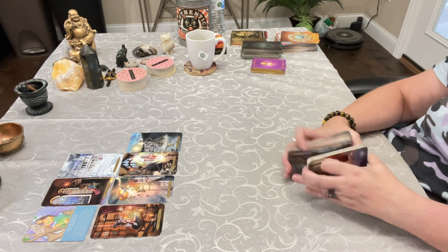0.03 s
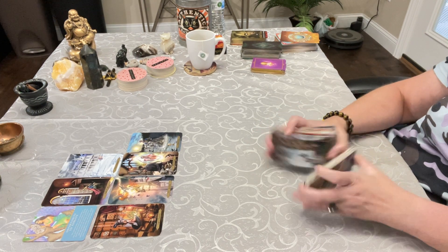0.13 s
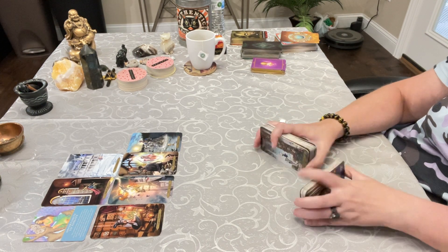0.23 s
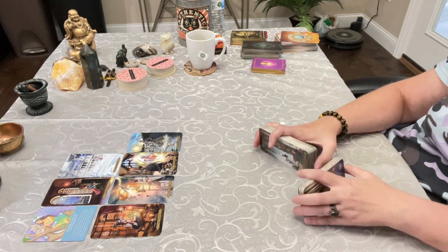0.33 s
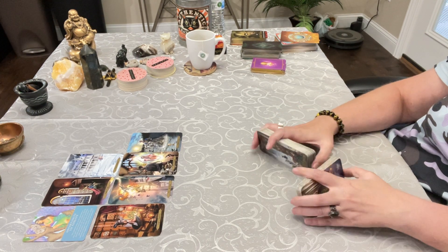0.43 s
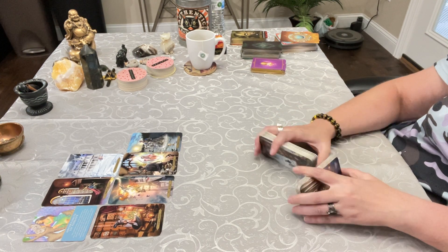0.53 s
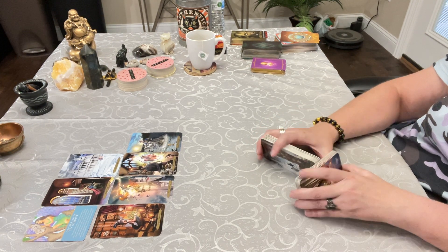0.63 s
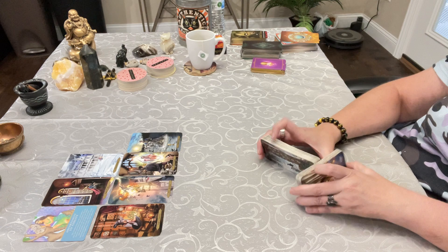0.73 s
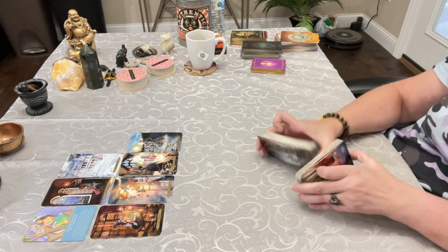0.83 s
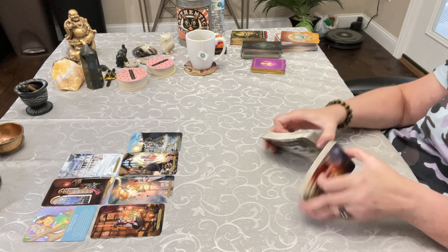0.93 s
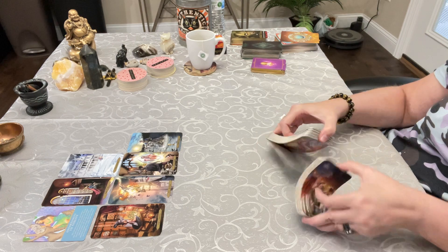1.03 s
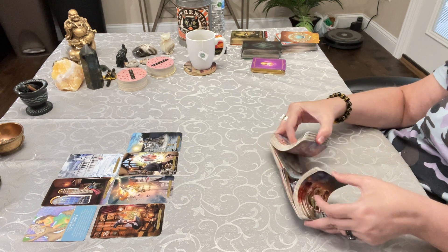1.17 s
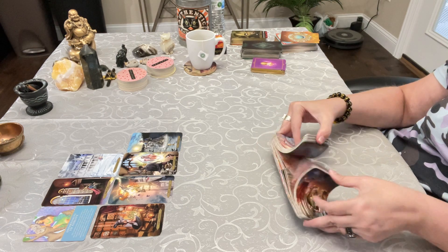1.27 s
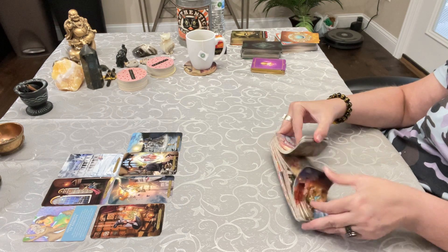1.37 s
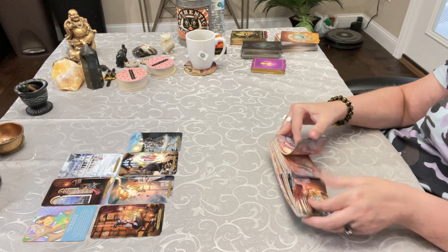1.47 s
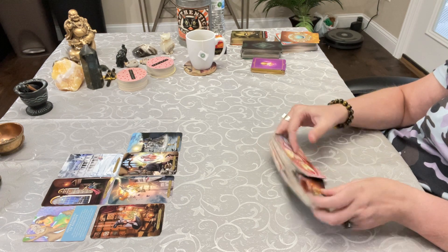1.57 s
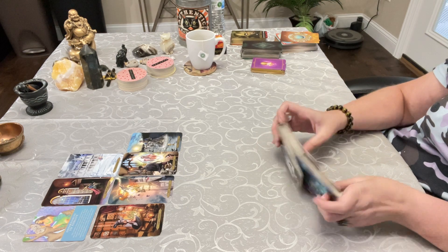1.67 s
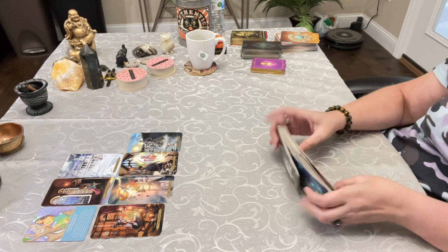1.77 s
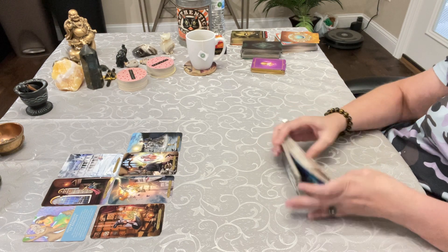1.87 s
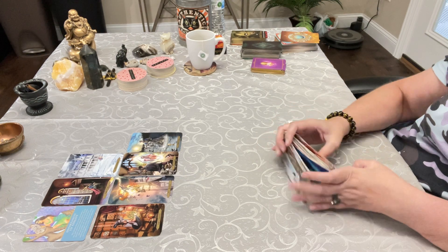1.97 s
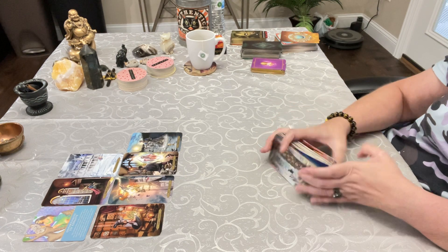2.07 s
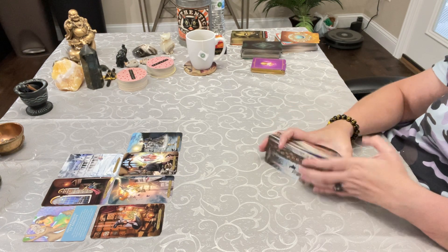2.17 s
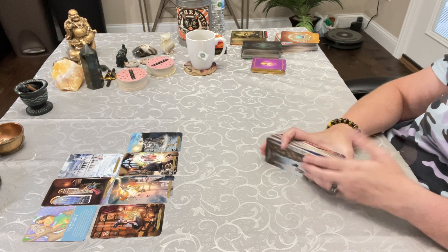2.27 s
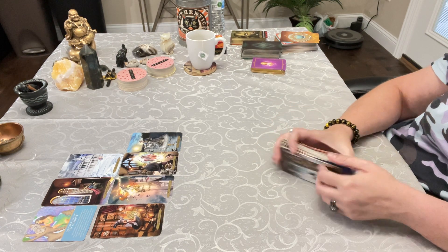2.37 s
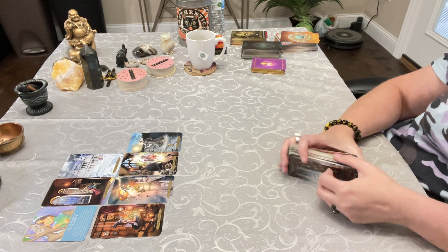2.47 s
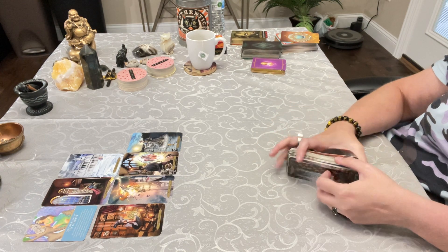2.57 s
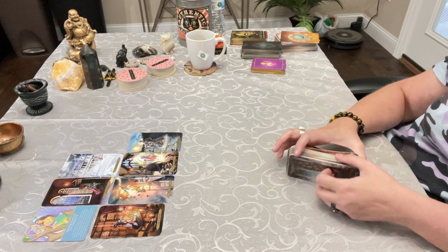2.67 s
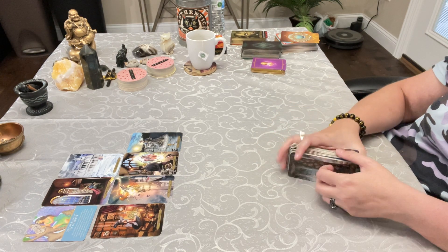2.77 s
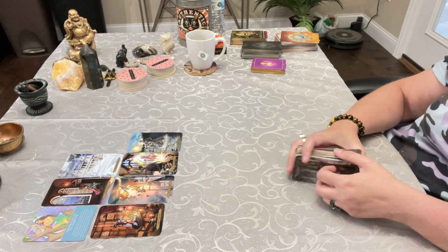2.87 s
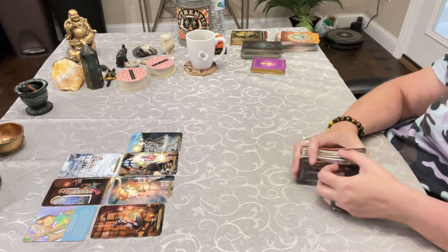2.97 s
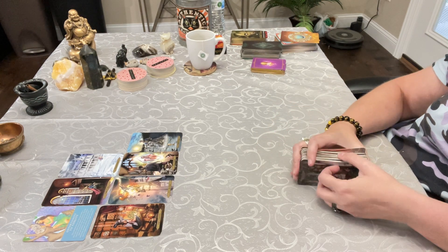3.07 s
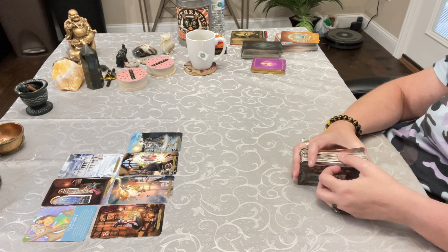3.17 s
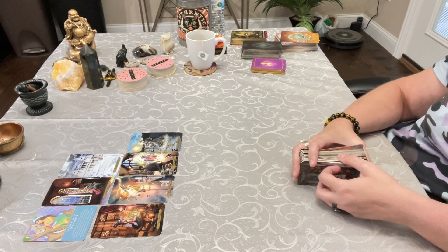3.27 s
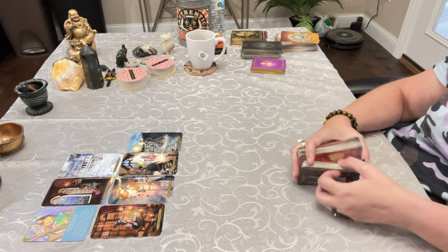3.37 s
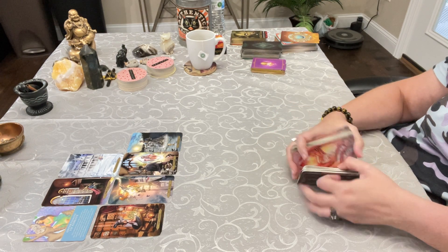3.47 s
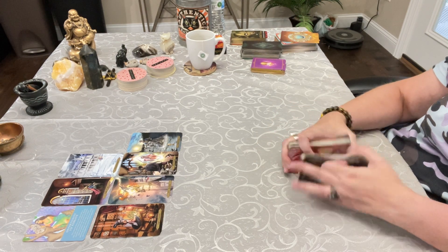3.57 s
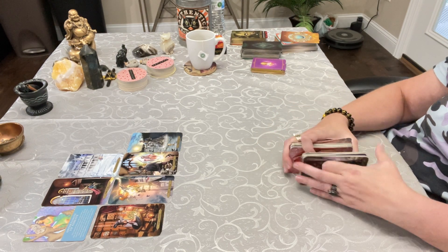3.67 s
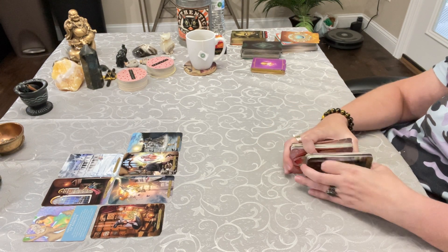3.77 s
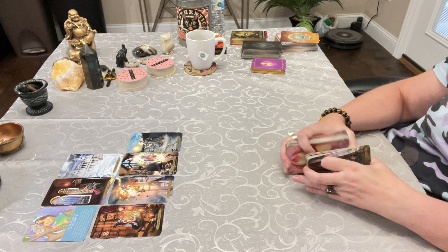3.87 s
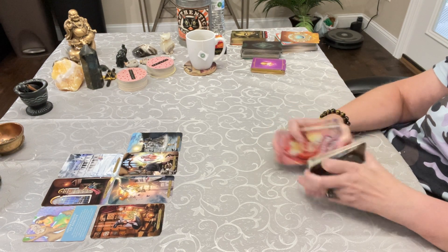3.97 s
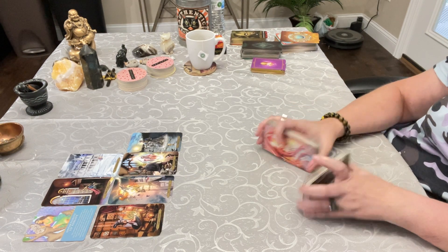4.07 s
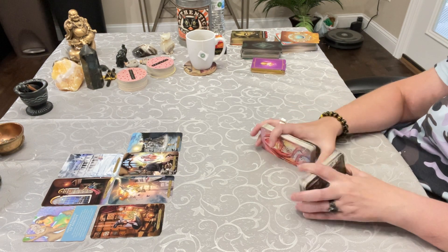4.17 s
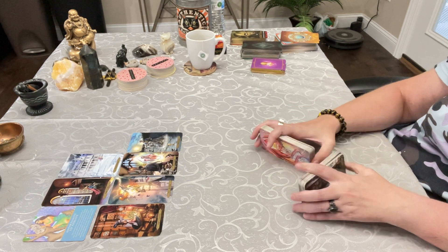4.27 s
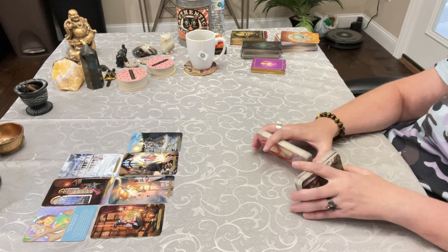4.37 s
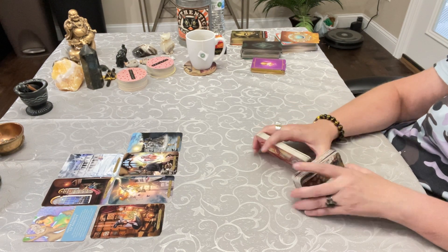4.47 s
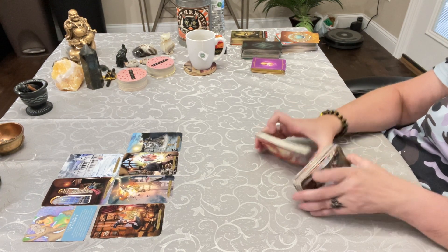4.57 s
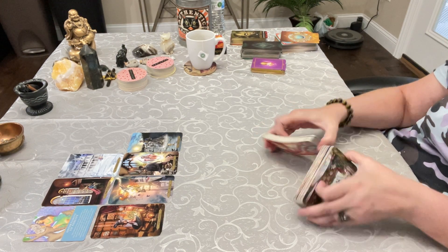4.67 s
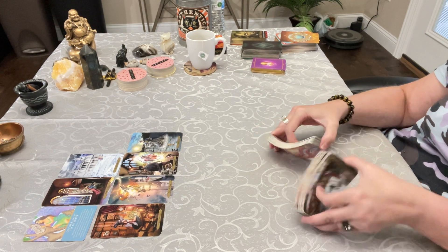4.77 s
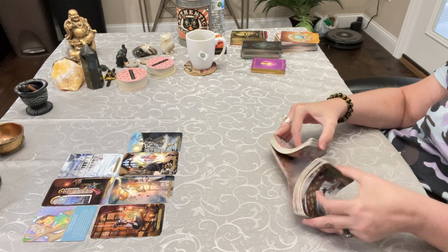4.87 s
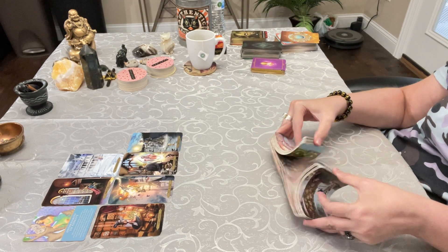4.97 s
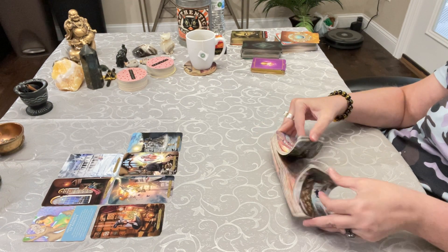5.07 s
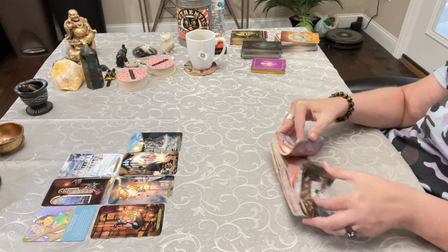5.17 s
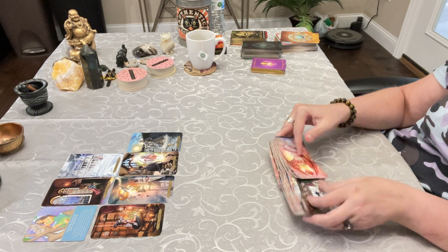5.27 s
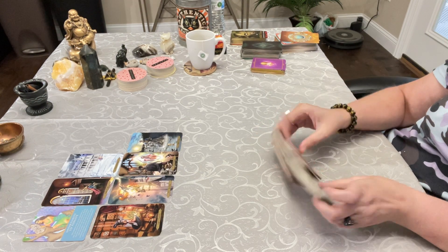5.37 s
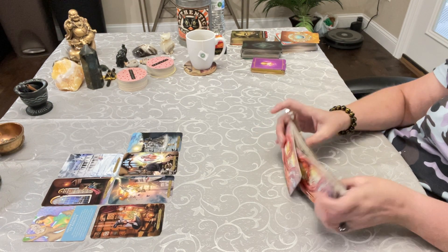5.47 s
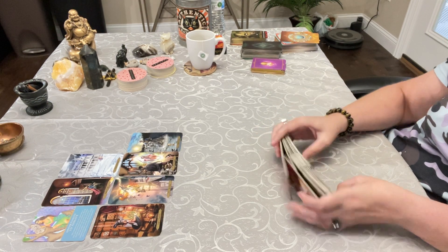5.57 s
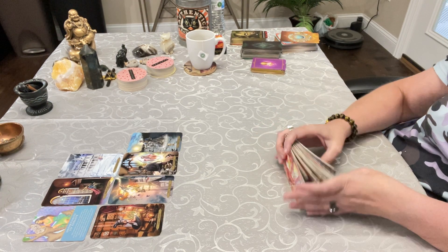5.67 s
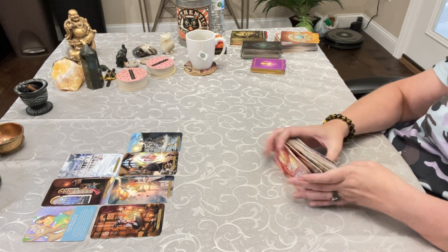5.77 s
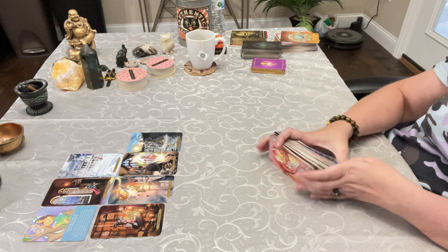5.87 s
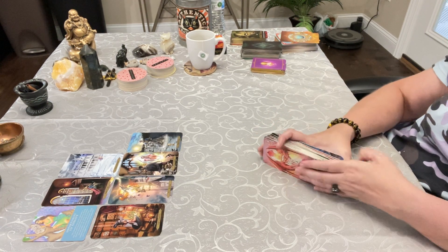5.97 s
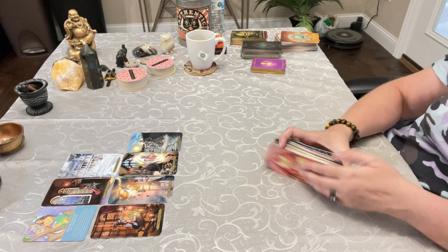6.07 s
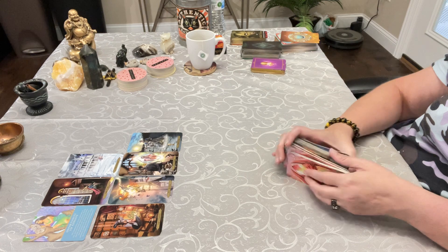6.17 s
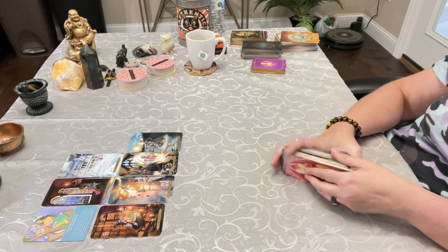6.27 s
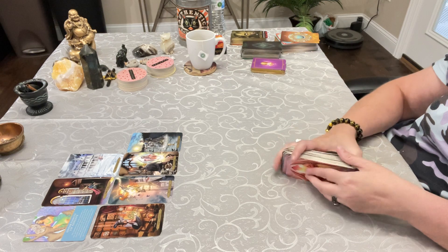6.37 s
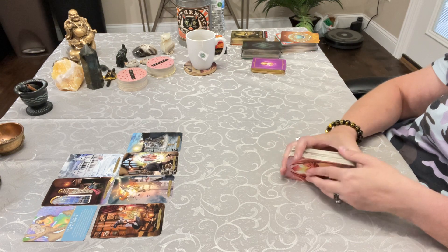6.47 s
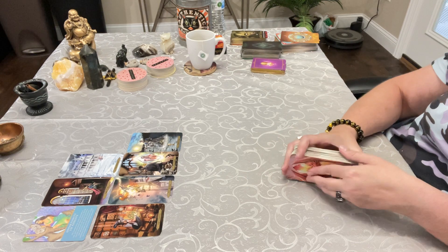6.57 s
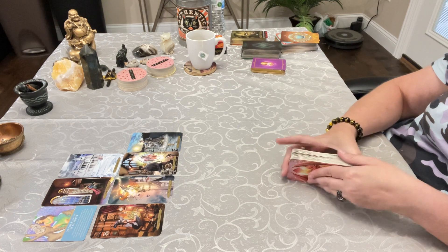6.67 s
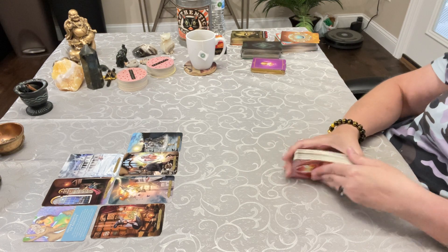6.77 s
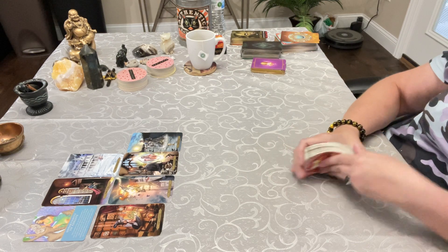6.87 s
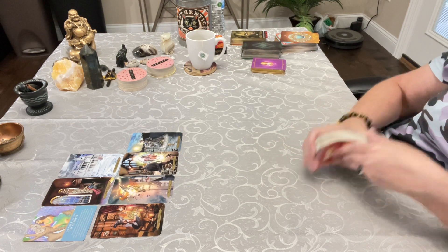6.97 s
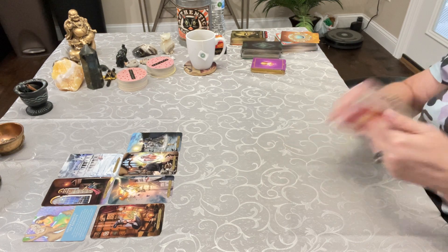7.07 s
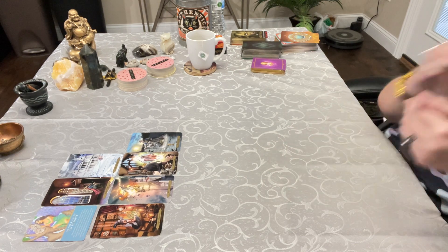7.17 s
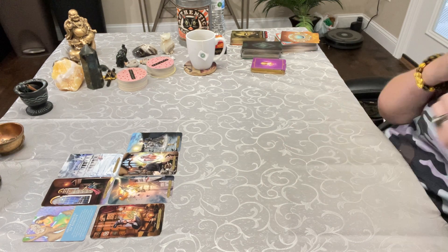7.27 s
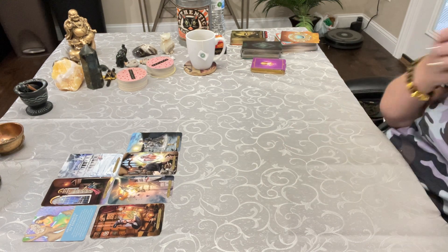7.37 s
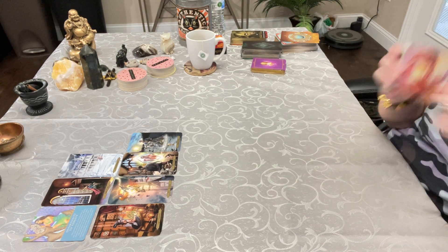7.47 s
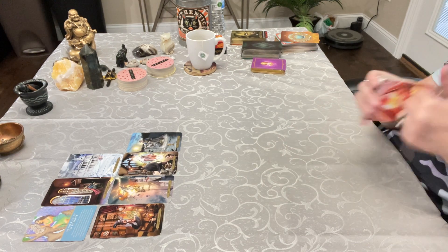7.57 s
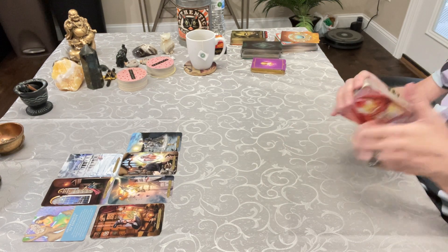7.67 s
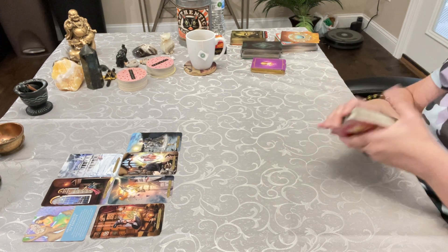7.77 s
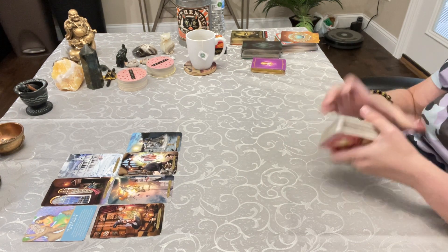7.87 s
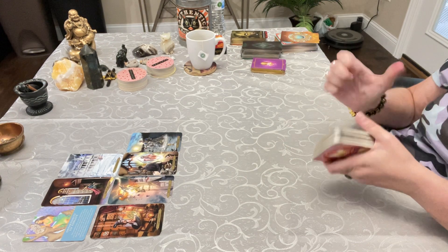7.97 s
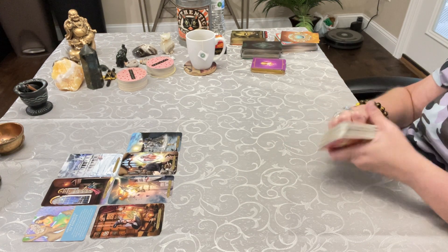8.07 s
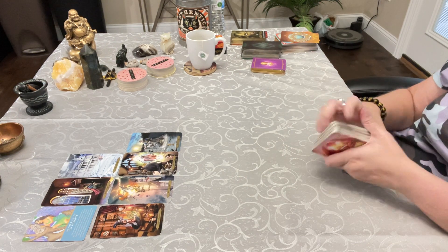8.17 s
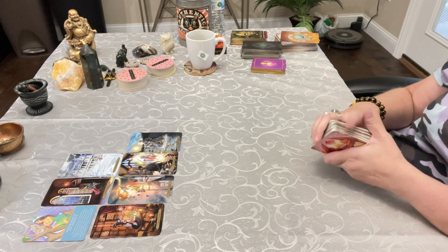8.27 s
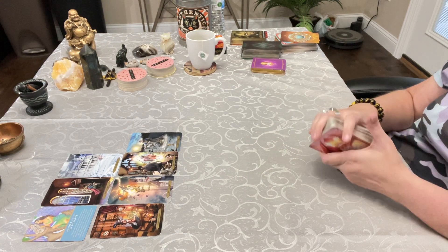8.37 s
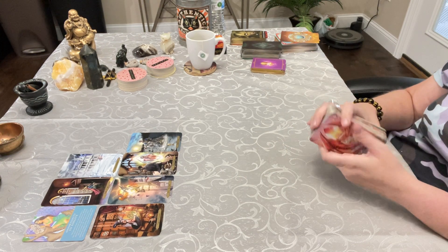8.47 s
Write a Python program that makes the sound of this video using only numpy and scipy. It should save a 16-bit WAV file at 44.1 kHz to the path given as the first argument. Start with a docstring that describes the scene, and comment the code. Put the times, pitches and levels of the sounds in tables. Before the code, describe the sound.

A deck of cards is riffled twice in crisp bursts, knocked and squared on a table, then slapped into a hand in a quiet room.

```python
"""Two riffle shuffles on a cloth-covered table

A quiet room, a two-port microphone close to the hands. Large cards snap off the thumbs and patter
onto the pile; around the riffles the deck is knocked, squared and slid about, then lifted and
slapped into a cupped palm. The table top booms under each knock and the room rings briefly."""
import sys
import numpy as np
from scipy import signal
from scipy.fft import rfft, irfft, next_fast_len
from scipy.io import wavfile

SR = 44100
rng = np.random.default_rng(int(sys.argv[2]) if len(sys.argv) > 2 else 0)


def transcribe(u):
    """Save the signal u as a 16-bit wav file named by the first command-line argument.

    u: samples, shape (n,) or (channels, n), limited to [-1, 1]; the rate is SR.
    q: integer samples, one column per channel.
    """
    v = np.clip(np.atleast_2d(u).T, -1, 1)
    q = np.round(v * 32767).astype(np.int16)
    wavfile.write(sys.argv[1], SR, q)


N = 375291


def flick(db, hz, ms, tick_db, puff_db):
    """A bent card scrapes free and rings for an instant; its edge ticks and it pushes a puff of air."""
    ring = [(hz / 3.3, -30), (hz / 2.6, -13), (hz / 1.5, -7), (hz, 0),
            (hz * 1.3, -7), (hz * 2.3, -12), (hz * 5.4, -26), (hz * 6, -50)]
    card = burst(ring, 0.4 * ms, 0.57 * ms)
    tick = burst([(4500, -45), (6500, 2.5), (11000, -3), (16500, -13.5)], 0.087 * ms, 0.69 * ms)
    puff = burst([(120, -27), (350, -1.5), (800, -0.5), (1300, -5), (2500, -45)], 0.17 * ms, 0.35 * ms)
    return gain_of(db) * (card + gain_of(tick_db) * tick + gain_of(puff_db) * puff)


# single card edges coming free: t/s, level/dB, card f/Hz, relative tick level/dB
SNAPS = [(0.092, -55.5, 2480, -3), (0.843, -45, 919, -2), (.893, -50.5, 1292, 0.5),
         (1.1074, -30, 1460, -16.5), (1.13, -21, 2760, -1.5), (1.1473, -19.5, 2507, -9.5),
         (1.1545, -11.5, 2715, -3.5), (1.1696, -28.5, 3794, -3.5), (1.248, -23, 1760, -9),
         (1.2566, -15.5, 3096, -3), (1.2691, -23, 3280, -3.5), (1.288, -10, 3090, -15.5),
         (1.2993, -14, 3446, -11.5), (1.3095, -18.5, 2907, -11.5), (1.3311, -21.5, 3947, -13.5),
         (1.3445, -12, 2646, -23), (1.3599, -17.5, 3843, 3), (1.371, -25.5, 2806, 1.5),
         (1.421, -26, 1838, -4), (1.4366, -15.5, 2497, -36.5), (1.4756, -26, 2526, 0),
         (1.4786, -19.5, 3215, -9), (1.5012, -30, 2580, -11), (1.5185, -22, 4480, -14),
         (1.5333, -24, 4116, -10.5), (2.452, -51, 1020, -18), (2.548, -46, 1130, -20),
         (2.613, -44, 2020, -5.5), (2.846, -58.5, 3876, 5), (3.411, -45, 1920, -10),
         (3.593, -54.5, 4500, 11), (3.619, -57, 3500, -0.5), (3.987, -58, 3200, -23),
         (4.502, -49, 1253, -9.5), (4.605, -53.5, 2960, -13), (4.644, -58.5, 876, -20),
         (4.748, -61.5, 1360, 0.5), (4.8569, -30.5, 2495, -27), (4.8774, -30, 1600, -31),
         (4.891, -26, 2270, -1.5), (4.9198, -25, 2010, 0), (4.951, -23, 2646, -3),
         (4.974, -24.5, 1810, -4.5), (4.9839, -22.5, 3130, 3.5), (4.99, -17.5, 3780, -12),
         (5.0039, -33.5, 1862, -2), (5.0186, -23, 2194, -4), (5.0316, -28.5, 3167, 4.5),
         (5.0472, -24, 2745, -4.5), (5.0527, -15.5, 2737, -1), (5.0621, -21, 2450, -6),
         (5.0809, -12, 3537, -14), (5.0855, -20, 3450, 0), (5.1126, -19, 2645, -8),
         (5.1301, -26.5, 3320, -0.5), (5.14, -21.5, 2153, -2), (5.1543, -17.5, 2650, -13),
         (5.1638, -24.5, 1980, -24), (5.1718, -31, 3394, 15), (5.1921, -19, 2770, -8),
         (5.209, -19.5, 2530, -20), (5.233, -22, 2890, -32.5), (5.257, -28, 3400, -25),
         (5.2671, -26, 3500, -3.5), (5.2833, -30.5, 2770, -24.5), (5.423, -39, 2740, -27),
         (5.46, -35.5, 3470, -5.5), (6.848, -27, 1600, -13), (6.958, -43.5, 3060, -28),
         (7.758, -44, 3240, -16), (7.855, -55, 4660, -14), (8.151, -38.5, 2396, -21),
         (8.233, -50.5, 3320, -9)]
RIFFLED_MS, CAUGHT_MS = 3.2, 2.2  # a bent card scrapes longer than a loose edge

def snaps():
    """Cards snap off a thumb onto the pile, drumming on the table, or catch between raised hands."""
    cards, aloft, force = np.zeros((3, N))
    spans = [(rows[0][0], rows[-1][0]) for rows in RIFFLES]
    for s, db, hz, tick_db in SNAPS:
        stretch = np.exp(0.17 * rng.standard_normal())
        progress = [(s - start) / (end - start) for start, end in spans if start <= s <= end]
        if progress:
            excess_db = db + 22
            ms = RIFFLED_MS * stretch * gain_of(0.24 * excess_db)  # harder snaps last longer
            puff_db = -21.5 + 0.42 * excess_db - 8 * progress[0]  # puffs fade as the pile builds
            add(cards, s, flick(db, hz, ms, tick_db, puff_db - db))
            add(force, s, push(db - 11, ms=3.9))
        else:
            add(aloft, s, flick(db, hz, CAUGHT_MS * stretch, tick_db, puff_db=-7.5))
    return cards, aloft, force


# outline of the patter, one list a riffle: t/s, level/dB
RIFFLES = [
    [(1.1, -58), (1.2, -45.5), (1.3, -38.5), (1.386, -37), (1.56, -50)],
    [(4.85, -44.5), (4.95, -39), (5.048, -31), (5.128, -30.5), (5.22, -41), (5.3, -37.5)],
]
# spectrum of falling cards: f/Hz, level/dB
FALL_COLOUR = [(150, -14), (400, -1.5), (1600, 0.5), (2900, -6.5), (6000, -5.5), (10000, -17.5),
               (15000, -22), (16500, -25)]

def patter():
    """Cards patter onto the pile between the loud snaps."""
    t = np.arange(N) / SR
    outline = sum(gain_of(np.interp(t, *np.transpose(rows), -200, -200)) for rows in RIFFLES)
    return coloured(grit(per_s=400, spread_db=3.5, decay_ms=1.2), FALL_COLOUR) * outline


def blow(db, hz, ms, crack_db):
    """A dull blow centred on hz, with a crack where card edges meet."""
    colour = [(80, -20), (hz / 6.4, -5), (hz, 0), (hz * 3.24, -12), (hz * 9.6, -45), (16000, -75)]
    thud = burst(colour, 1, ms, size=8192)
    crack = burst([(1500, -28.5), (3500, -4), (5500, -8.5), (8000, -14.5), (16000, -24)], 0.054, 1.3)
    add(thud, 0, gain_of(crack_db) * crack)
    return gain_of(db) * thud


# the deck striking the table, the last one knocked in the hands: t/s, level/dB, decay/ms, relative boom
# level/dB
KNOCKS = [(.208, -40.5, 47, 0), (.226, -20.5, 6.9, 8), (0.238, -27, 8.3, -6.5), (.6, -58, 8, 29),
          (0.808, -60, 10, 17), (1.035, -65, 12, 25), (1.829, -47.5, 19, 16), (2.066, -42.5, 9.4, 10),
          (2.401, -59, 6.6, 24), (2.497, -56, 6.9, 19), (3.549, -56, 9.4, 15.5), (3.621, -56, 7, 13.5),
          (4.085, -20, 9, -6.5), (4.103, -21, 13.2, 7.5), (4.709, -53, 11, 10), (5.502, -35.5, 24, 4),
          (5.517, -35.5, 5.7, 7), (5.79, -46, 48, 11), (5.82, -41, 7.3, 9.5), (6.164, -52, 8, 14.5),
          (6.254, -39, 11, 8), (6.277, -42, 10, 6.5), (6.662, -57, 11, 24.5), (7.762, -48, 5.1, -13.5)]

def knocks():
    """The deck hits the table, and once is knocked in the hands: harder knocks are brighter, softer ones push
    for longer."""
    cards, force = np.zeros((2, N))
    for s, db, ms, boom_db in KNOCKS:
        excess_db = db + 45
        hardness_hz = 480 * gain_of(0.22 * excess_db)
        crack_db = -77 + 0.4 * excess_db
        add(cards, s, blow(db, hardness_hz, ms, crack_db - db))
        add(force, s, push(db + boom_db, ms=1200 / hardness_hz))
    return cards, force


# the deck landing in the palm: t/s, level/dB, hardness f/Hz, decay/ms, relative crack level/dB
SLAPS = [(7.512, -18.5, 1550, 4.5, -15), (8.046, -53, 1203, 25, -32), (8.056, -24, 860, 2.16, -3.5),
         (8.06, -33.5, 900, 5.1, -4)]
CUP_HZ, CUP_T60_S, CUP_DB = 736, 0.036, -17

def slaps():
    """The lifted deck slaps the cupped palm and leaves the air hollow between them humming."""
    aloft, t = np.zeros(N), np.arange(8192) / SR
    cup = gain_of(-60 * t / CUP_T60_S) * np.sin(2 * np.pi * CUP_HZ * t)
    for s, *row in SLAPS:
        hit = blow(*row)
        hum = signal.fftconvolve(hit, cup / np.linalg.norm(cup))[:len(t)]
        add(aloft, s, hit + gain_of(CUP_DB) * hum)
    return aloft


def push(db, ms):
    """The smooth force of a blow; db sets its area."""
    bump = np.hanning(round(ms * SR / 1000) + 2)
    return gain_of(db) * bump / bump.sum()


# modes of the table top, and one of the deck near 1 kHz: f/Hz, level/dB, t60/s
TABLE_MODES = [(62, -7, .14), (90, -2, .12), (122, 5, .24), (165, -3, .1), (200, -4, .1), (255, -3, .12),
               (322, 0, .15), (608, -5, .12), (1060, -6, .05)]

def table_boom(force):
    """The table top rings in its low modes under each push, the deck briefly near 1 kHz."""
    t = np.arange(16384) / SR
    ring = sum(gain_of(db - 60 * t / t60) * np.sin(2 * np.pi * hz * t) for hz, db, t60 in TABLE_MODES)
    return signal.fftconvolve(force, ring / abs(ring).max())[:N]


# cards and sleeves sliding, one swell each: peak t/s, hiss level/dB, length/ms, drag level/dB
RUBS = [(0.104, -71, 11, -86), (0.58, -64.5, 107, -61), (0.681, -67, 24, -60), (0.882, -69, 122, -67.5),
        (1.698, -59.5, 290, -58), (1.899, -47, 69, -69), (2.109, -59.5, 88, -60), (2.21, -61.5, 44, -59),
        (2.413, -60.5, 183, -67), (2.604, -63.5, 70, -70.5), (2.859, -59, 38, -69), (3.27, -94, 51, -69.5),
        (3.395, -63, 70, -60.5), (3.6, -67.5, 130, -65.5), (3.815, -76, 78, -74.5), (4.495, -73, 120, -65),
        (4.619, -64, 29, -71), (4.75, -67.5, 61, -65), (5.44, -61.5, 350, -59), (5.635, -45.5, 53, -65),
        (5.9, -66, 230, -68), (6.097, -59.5, 57, -70), (6.27, -64, 130, -60), (6.445, -67, 97, -68),
        (6.626, -68, 56, -75), (6.771, -66, 38, -58), (6.92, -63.5, 164, -64), (7.18, -53.5, 79, -54.5),
        (7.27, -42, 61, -43), (7.41, -66.5, 129, -56.5), (7.778, -67, 80, -64), (8.121, -65, 58, -57),
        (8.235, -65.5, 107, -59.5)]
# spectra of card hiss and cloth drag: f/Hz, level/dB
HISS_COLOUR = [(600, -32.5), (1200, -7), (2100, 0), (3700, 1), (6500, -2), (10000, -4), (14500, -13),
               (16500, -20.5)]
DRAG_COLOUR = [(50, -10.5), (120, -3), (280, -4.5), (600, -6.5), (1050, -3.5), (2000, -12.5), (4000, -42.5)]
RISE_SHARE = 0.61

def rubbing():
    """Card faces slide over each other with a fine hiss; hands drag softly on the cloth."""
    t_ms = np.arange(-SR // 2, SR // 2) / SR * 1000
    hiss, drag = np.zeros((2, N + SR))
    side = np.where(t_ms < 0, RISE_SHARE, 1 - RISE_SHARE)
    for s, hiss_db, ms, drag_db in RUBS:
        swell = gain_of(-6 * (abs(t_ms) / (side * ms)) ** 1.5)
        add(hiss, s, gain_of(hiss_db) * swell)
        add(drag, s, gain_of(drag_db) * swell)
    fine = coloured(grit(per_s=3000, spread_db=2.5, decay_ms=1.5), HISS_COLOUR)
    coarse = coloured(grit(per_s=600, spread_db=2.2, decay_ms=5), DRAG_COLOUR)
    return fine * hiss[SR // 2:][:N] + coarse * drag[SR // 2:][:N]


# decay of the room: f/Hz, t60/s
ROOM_DECAY = [(80, 0.6), (500, 0.37), (2000, 0.58), (6000, 0.23), (14000, 0.96)]
# spectrum of its reflections: f/Hz, level/dB
ROOM_COLOUR = [(80, 8.5), (500, 0.5), (2000, -2.5), (6000, 1), (14000, -17)]

def room(x):
    """Reflections come back after a short gap, each band dying at its own speed."""
    hz, t = np.fft.rfftfreq(256, 1 / SR), np.arange(420) * 64 / SR
    decay = gain_of(read(ROOM_COLOUR, hz)[:, None] - 60 * t / read(ROOM_DECAY, hz)[:, None])
    tail = signal.istft(diffuse(len(t), hz) * decay, nperseg=256, noverlap=192)[1]
    tail *= 1 - np.exp(-(np.arange(tail.shape[1]) / SR / 0.0011) ** 2)
    return signal.fftconvolve(x[None], tail / np.linalg.norm(tail[0]), axes=1)[:, :N]


# spectrum of the room tone: f/Hz, level/dB
HUSH_COLOUR = [(20, -11.5), (45, 4), (65, 5), (110, -12.5), (300, -20), (800, -27.5), (1500, -34),
               (4000, -33), (10000, -40.5), (16500, -48)]

def hush():
    """The still room and the microphone's own noise."""
    hz = np.fft.rfftfreq(1024, 1 / SR)
    spectra = diffuse(N // 256 + 5, hz) * gain_of(read(HUSH_COLOUR, hz))[:, None]
    return gain_of(-62.5) * unit_rms(signal.istft(spectra, nperseg=1024, noverlap=768)[1][:, :N])


# diffuse sound at the microphone: f/Hz, left-right correlation
LIKENESS = [(60, 1), (300, 0.32), (1500, 0.17), (4000, 0.043), (8000, 0.17)]

def diffuse(frames, hz):
    """Random short-time spectra for two ports, alike in the bass."""
    a, b, c, d = rng.standard_normal((frames, len(hz), 4)).T
    same, left = read(LIKENESS, hz)[:, None], a + 1j * b
    return np.array([left, same * left + np.sqrt(1 - same ** 2) * (c + 1j * d)])


# the deck's path past the microphone: t/s, left delay/samples
LEFT_LAG = [(6.2, 0), (7.05, 2), (7.1, 11), (7.48, 8), (8, 6), (8.4, 1)]

def carried(near):
    """The hands carry the deck to one side and back, so the left port hears it later."""
    lag = np.round(np.interp(np.arange(N) / SR, *np.transpose(LEFT_LAG))).astype(int)
    return np.array([near[np.arange(N) - lag], near])


# phase gap between the ports: f/Hz, left lead/rad
PORT_PHASE = [(1000, 0), (6200, .2), (7400, 2.6), (8500, 3.1), (10200, 0), (11300, -1.4), (12800, -3.1),
              (14700, -6.1), (16500, -6.7)]

def ports(pair):
    """Sound reaches the two ports with a phase gap that changes with pitch, a touch louder left."""
    size = next_fast_len(N)
    half = np.exp(.5j * read(PORT_PHASE, np.fft.rfftfreq(size, 1 / SR)))
    return irfft(rfft(pair, size) * np.array([half, 1 / half]), size)[:, :N] * gain_of([[.3], [-.3]])


def burst(points, rise_ms, decay_ms, size=2048):
    """Coloured noise that rises and falls, with no chance pitch of its own; rms 1 at its top."""
    ms = np.arange(size) / SR * 1000
    shape = (1 - np.exp(-ms / rise_ms)) ** 2 * np.exp(-ms / decay_ms)
    shape /= shape.max()
    colour = gain_of(read(points, np.fft.rfftfreq(size, 1 / SR)))
    sound = rng.standard_normal(size) * shape
    for _ in range(2):  # keep the random phases, restore the smooth colour, then the outline
        sound = irfft(colour * np.exp(1j * np.angle(rfft(sound))), size) * np.sqrt(shape)
    return sound * np.sqrt(np.sum(shape ** 2) / np.sum(sound ** 2))


def grit(per_s, spread_db, decay_ms):
    """Noise broken into short grains of very unequal size."""
    sizes = gain_of(spread_db * np.minimum(rng.exponential(1, N), 4))
    onsets = rng.random(N) < per_s / SR
    grain = np.exp(-np.arange(800) / SR * 1000 / decay_ms)
    return rng.standard_normal(N) * signal.oaconvolve(sizes * onsets, grain)[:N]


def coloured(x, points):
    """Shapes the spectrum of x; rms 1."""
    size = next_fast_len(len(x))
    colour = gain_of(read(points, np.fft.rfftfreq(size, 1 / SR)))
    return unit_rms(irfft(rfft(x, size) * colour, size)[:len(x)])


def read(points, hz):
    """A curve's value on a log frequency axis."""
    f, value = np.transpose(points)
    return np.interp(np.log(hz + 1), np.log(f + 1), value)


def high_passed(x, hz):
    return signal.sosfilt(signal.butter(2, hz, "high", fs=SR, output="sos"), x)


def gain_of(db):
    return 10 ** (np.asarray(db) / 20)


def unit_rms(x):
    return x / np.sqrt(np.mean(x ** 2) + 1e-20)


def add(mix, s, sound):
    part = mix[round(s * SR):][:len(sound)]
    part += sound[:len(part)]


def scene():
    """Hands and table close to the microphone, the room behind them."""
    falling = patter()
    riffled, caught, snap_force = snaps()
    knocked, knock_force = knocks()
    aloft = caught + slaps()
    hands = high_passed(falling + riffled + knocked, 170) + rubbing()
    boom = high_passed(table_boom(snap_force + knock_force), 68)
    near = hands + boom + high_passed(aloft, 220)
    # sounds in the raised hands face the ports and wake the room less
    around = room(hands + gain_of(-11) * boom + gain_of(-3) * aloft)
    return ports(carried(near) + gain_of(-6.5) * around + hush())


def record(dry):
    """The microphone loses the deepest bass and the highest treble."""
    band_limit = signal.firwin(511, 16300, window=("kaiser", 9), fs=SR)
    return signal.oaconvolve(high_passed(dry, hz=60), band_limit[None], "same")


dry = scene()
out = record(dry)
transcribe(out)
```